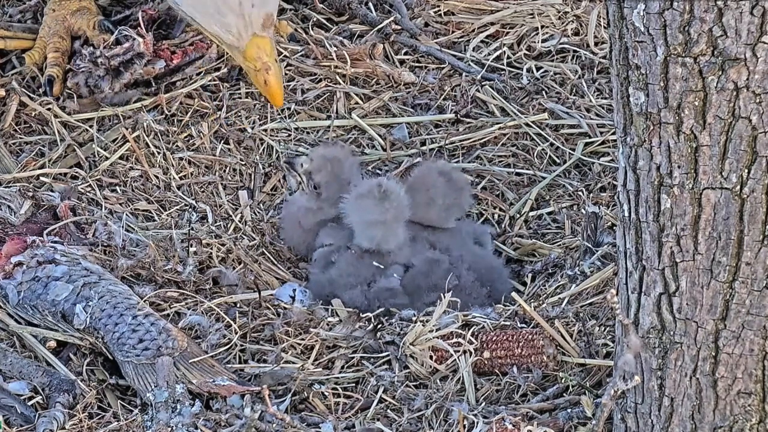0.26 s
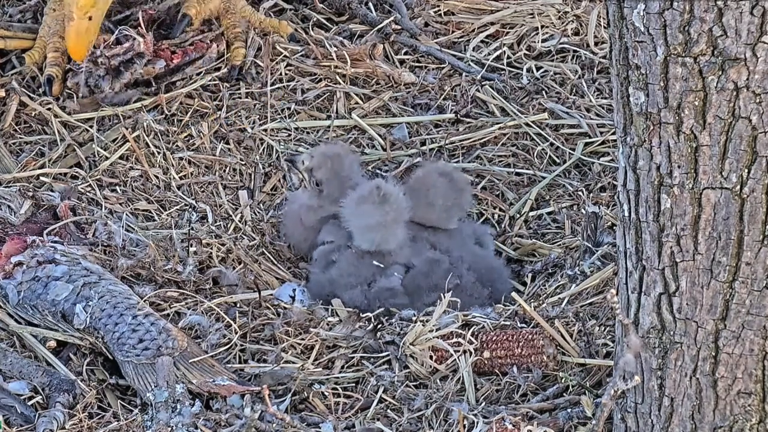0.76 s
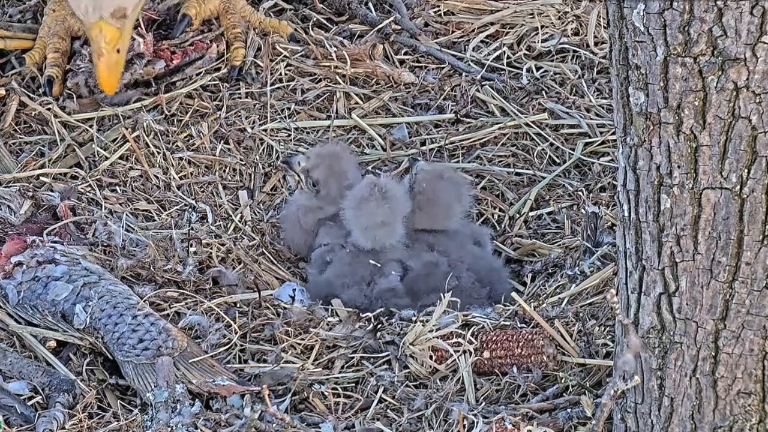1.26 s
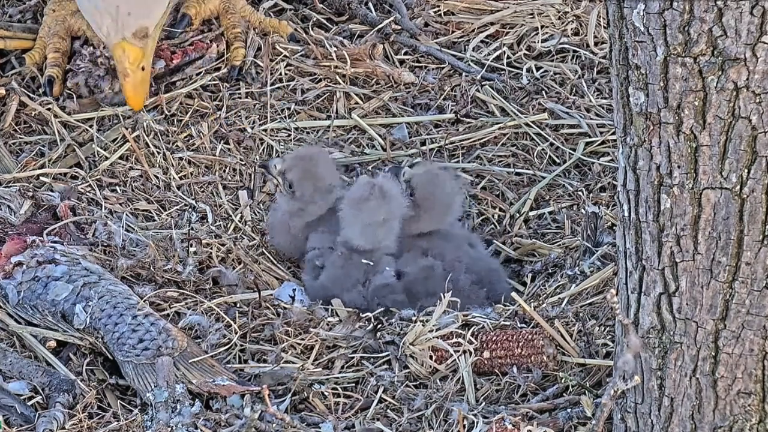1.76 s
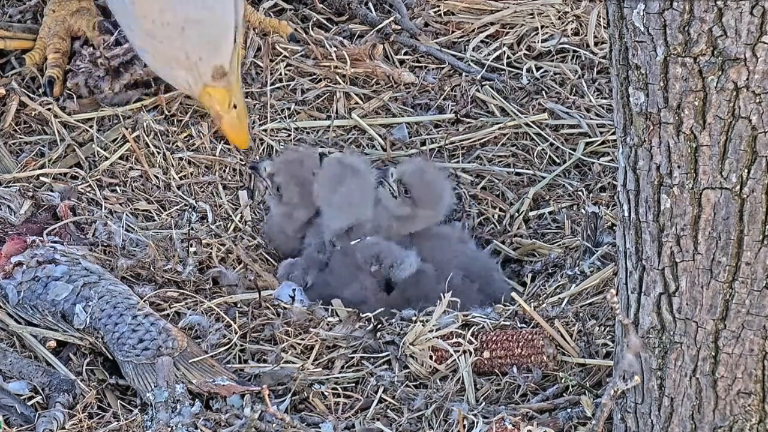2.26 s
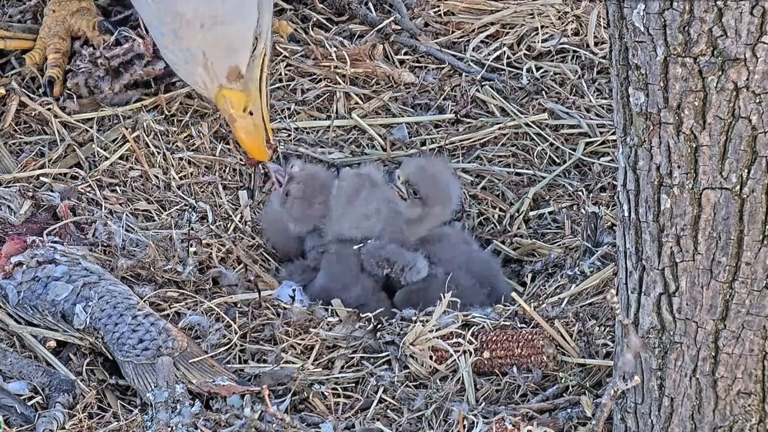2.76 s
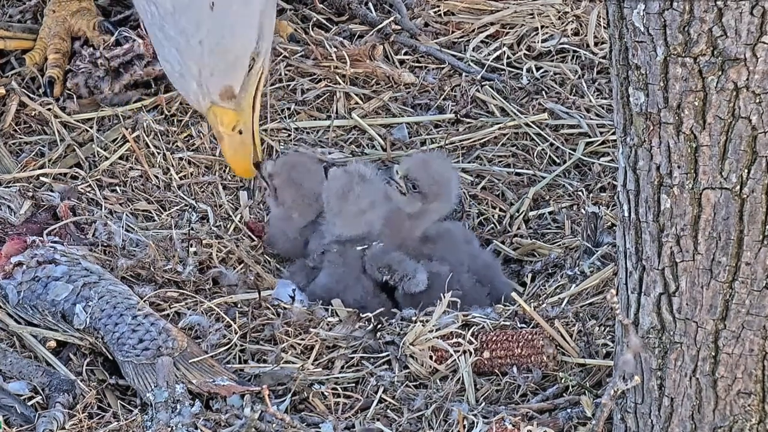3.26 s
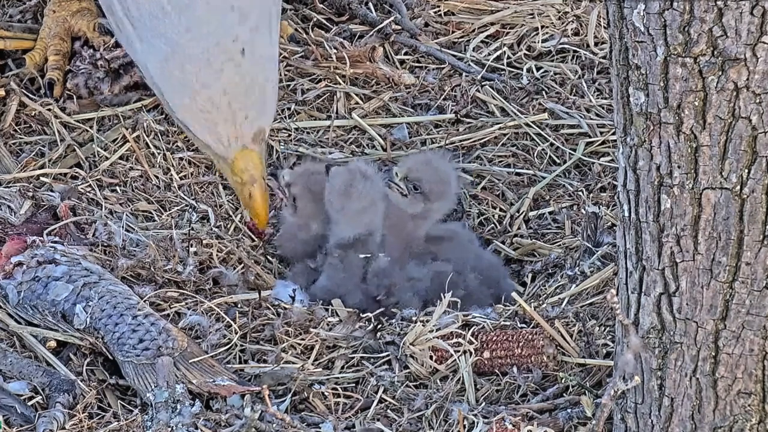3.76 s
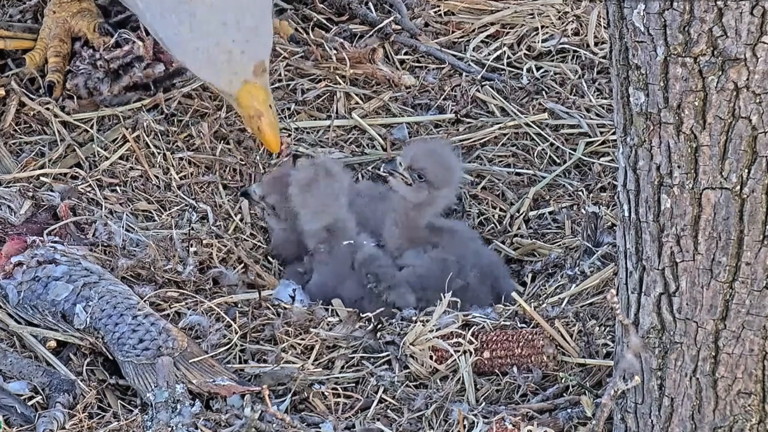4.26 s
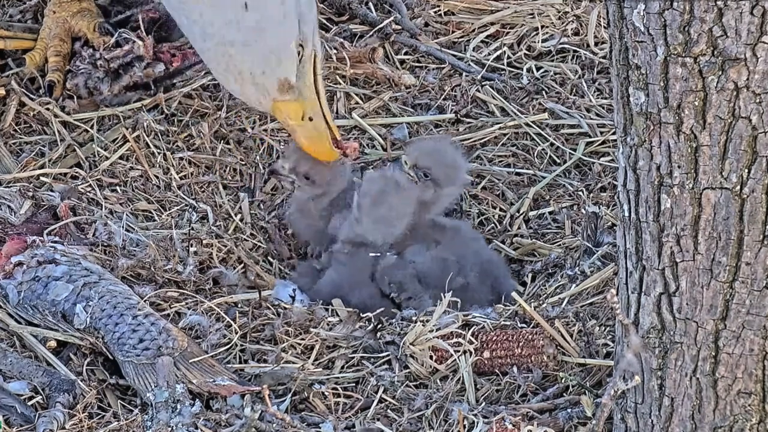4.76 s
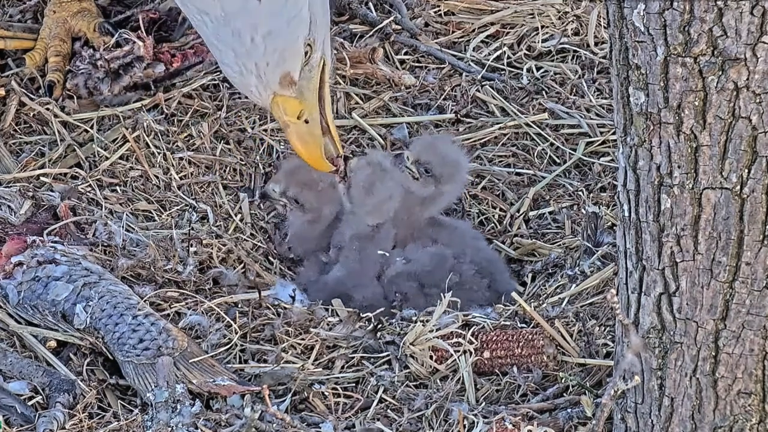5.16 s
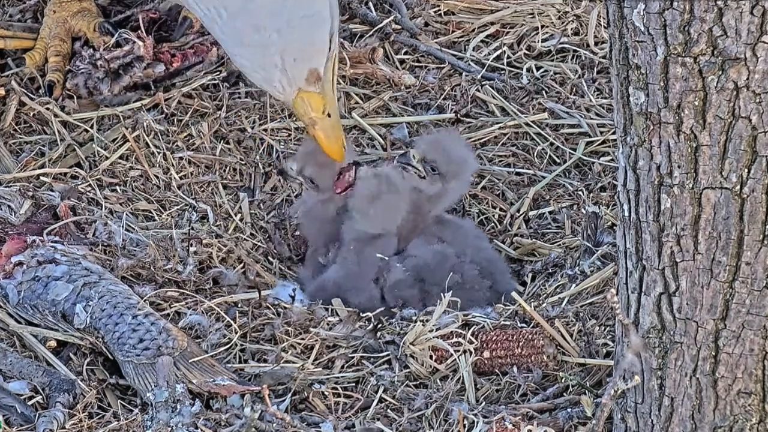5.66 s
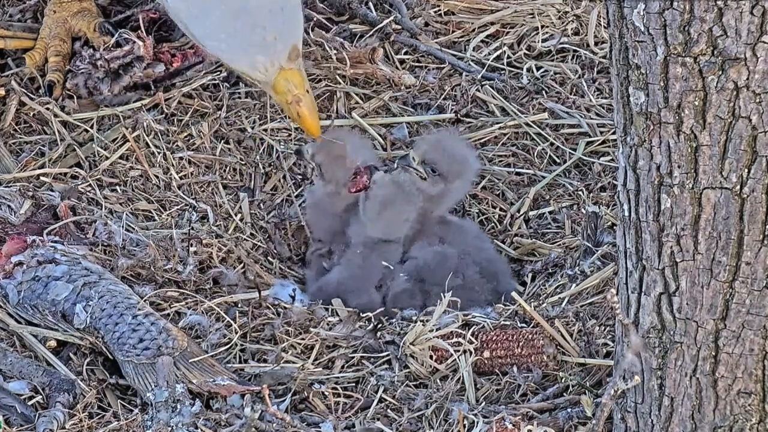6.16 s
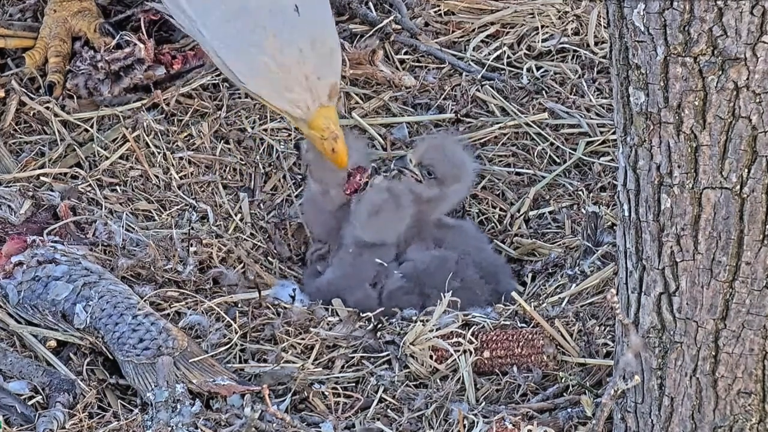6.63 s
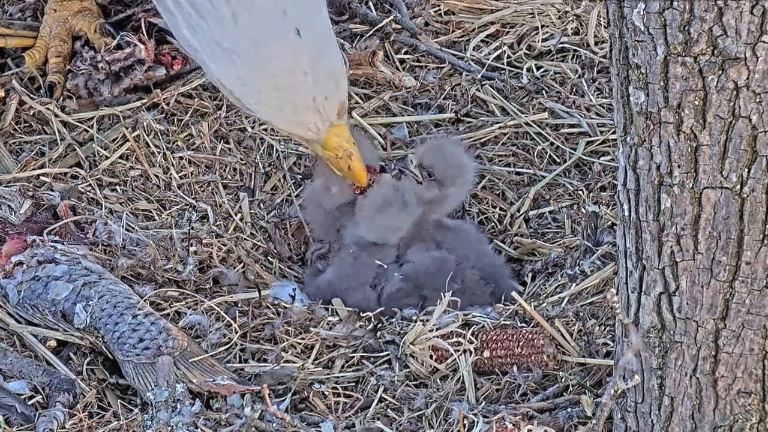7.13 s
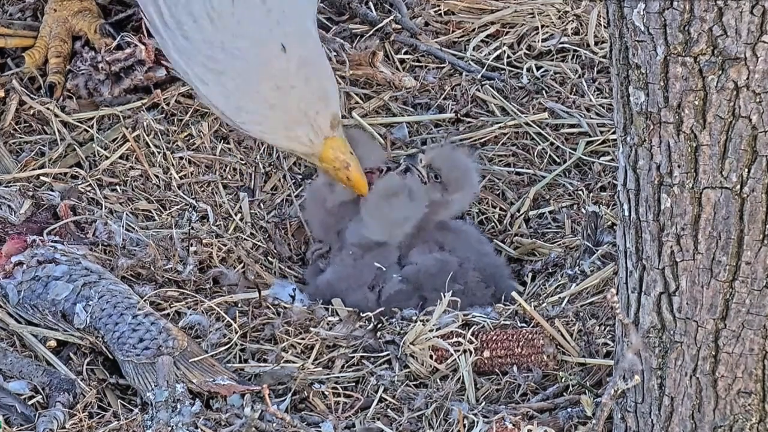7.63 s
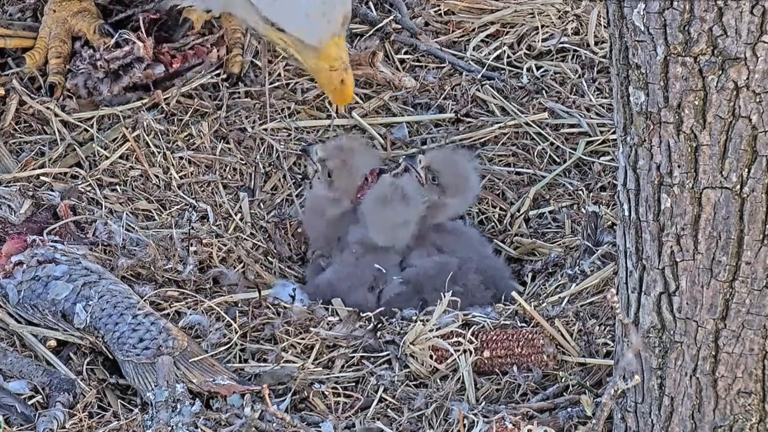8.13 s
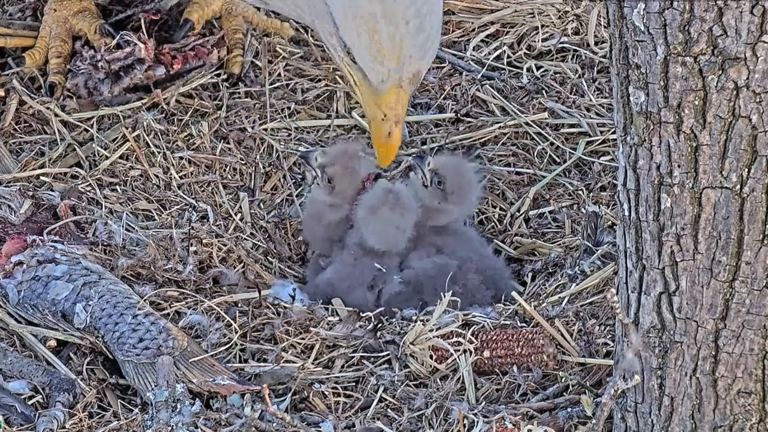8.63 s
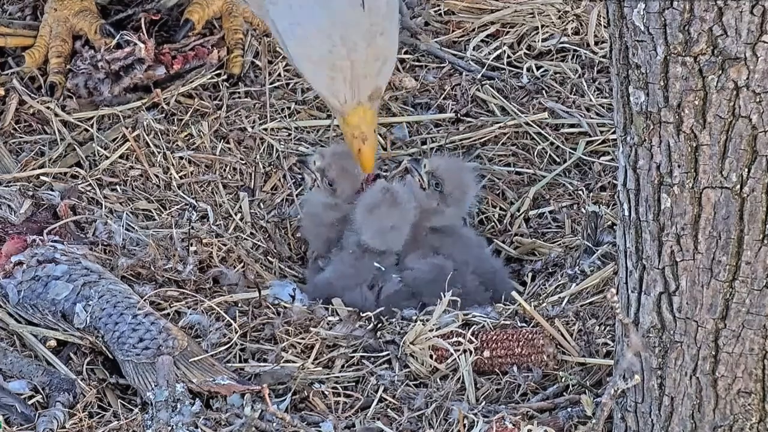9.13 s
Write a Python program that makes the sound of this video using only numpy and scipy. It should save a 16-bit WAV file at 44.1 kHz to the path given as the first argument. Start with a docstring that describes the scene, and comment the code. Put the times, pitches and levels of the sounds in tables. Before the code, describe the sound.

Downy eagle chicks in a treetop nest peep shrilly while an adult feeds them. Held whistles edging upward come first, then sharp chips, more whistles, and a regular run of quick multi-note begging calls. Softer whistles and two swooping bird songs follow, then scattered peeps. Distant traffic hum, hiss and a faint woodland chorus lie behind; the fixed camera microphone's stream ticks and briefly drops out.

```python
"""Chicks in a treetop nest peep, call and whistle: gliding sines with faint overtones and shaped puffs.
Other birds of the wood swoop, slide, fall and climb in pitch; a far chorus is many random short notes.
Leaves make the voices waver, and trunks return them as a long thin tail of random echoes.
Shaped noise is far traffic hum below and microphone hiss above; engine tones pass.
The camera's stream stutters: short gaps of silence and decaying ticks."""
import sys
import numpy as np
from scipy import signal
from scipy.fft import next_fast_len
from scipy.io import wavfile
from scipy.ndimage import uniform_filter1d

SR = 44100
rng = np.random.default_rng(int(sys.argv[2]) if len(sys.argv) > 2 else 0)


def int16_out(signal):
    """Quantize to a 16-bit WAV file."""
    q = np.round(np.clip(np.atleast_2d(signal).T, -1, 1) * 32767)
    wavfile.write(sys.argv[1], SR, q.astype(np.int16))


N = 414099  # samples

# Bird levels hold before flutter and mixing; note pitches hold before the onset scoop.
# held whistles creeping up in pitch:
# (time [s], length [s], end pitch [Hz], level [dB], share of the length spent swelling [1])
WHISTLES = [(0.921, 0.13, 2690, -35.5, 0.46), (1.197, .165, 2720, -22.5, 0.84),
            (1.384, 0.038, 2700, -30, 0.25), (1.497, .13, 2704, -21, 0.87), (2.699, 0.11, 2594, -39.5, .08),
            (2.931, 0.13, 2580, -37, 0.092), (3.147, 0.12, 2580, -37, 0.36), (3.656, 0.2, 2690, -30, 0.072),
            (3.89, 0.15, 2758, -24.5, 0.45), (4.042, 0.052, 2700, -30.5, 0.32),
            (4.174, 0.14, 2690, -23.5, 0.87), (4.349, .044, 2707, -28, 1), (5.819, 0.061, 2590, -35.5, 1),
            (6.298, 0.077, 2567, -37.5, 0.31), (6.698, 0.21, 2647, -32.5, 0.29),
            (6.947, 0.24, 2713, -27, 0.55), (7.223, .2, 2695, -29, 0.84), (7.443, 0.049, 2710, -32, .6),
            (7.536, 0.061, 2741, -30, 0.19), (9.373, 0.041, 2690, -34, .56)]
# second and third partial of a note: (level relative to the fundamental [dB])
OVERTONE_DB = [-51.5, -57]
# short notes, one table per shape: (time [s], length [s], start pitch [Hz], level [dB])
PEEPS = [(.306, 0.0094, 2710, -48), (.455, .023, 2717, -24), (.778, 0.015, 2640, -21.5),
         (.818, 0.022, 2670, -34.5), (1.058, 0.0073, 2638, -22.5), (1.103, .02, 2626, -28),
         (1.637, .029, 2721, -20.5), (2.483, 0.052, 2575, -35.5), (6.042, 0.085, 2580, -36.5),
         (6.492, 0.046, 2600, -34), (7.621, 0.044, 2800, -28), (7.805, 0.032, 2660, -34.5),
         (8.41, 0.042, 2620, -43.5), (8.513, .017, 2580, -23.5), (8.792, 0.012, 2580, -23.5),
         (9.058, 0.013, 2590, -30)]
RISING_PEEPS = [(.992, 0.021, 2560, -23.5), (4.76, 0.019, 2590, -19.5), (7.939, 0.027, 2587, -24.5),
                (8.226, .028, 2507, -25.5)]
PIPS = [(0, 0.063, 3960, -43.5), (.01, 0.22, 7850, -65.5), (.302, 0.12, 3275, -36.5),
        (.628, .064, 3365, -35.5), (.898, 0.12, 3415, -52), (1.72, 0.078, 4150, -62.5),
        (2.57, 0.049, 4320, -56), (4.928, 0.044, 4895, -56), (5.19, .06, 6900, -59),
        (5.33, 0.055, 7020, -55), (5.678, 0.051, 5620, -54), (5.71, 0.056, 6530, -52),
        (5.842, 0.018, 1730, -45), (5.949, 0.048, 2053, -40), (5.962, .058, 8070, -59),
        (6.052, 0.024, 1710, -51.5), (6.503, .016, 1730, -43), (6.97, .019, 1764, -47.5),
        (9.142, 0.044, 4050, -54.5)]
FALLS = [(.089, .04, 4300, -41), (.207, 0.02, 5900, -50), (.499, .076, 1466, -48),
         (.523, 0.023, 6700, -51.5), (.748, 0.062, 9130, -53.5), (.868, .059, 1466, -46.5),
         (1.205, 0.038, 7800, -64), (1.802, 0.029, 4430, -53), (2.498, .04, 4300, -53),
         (2.502, 0.049, 2180, -45.5), (2.96, .039, 1466, -47), (4.551, .045, 4450, -47),
         (4.86, 0.078, 8700, -73), (4.565, 0.071, 8500, -70.5), (4.952, 0.046, 4150, -38),
         (5.032, 0.038, 1400, -43.5), (5.128, .038, 7200, -52), (5.134, .028, 4520, -43),
         (5.268, .037, 4480, -43.5), (5.272, 0.025, 7080, -51), (5.457, 0.018, 4100, -34.5),
         (5.49, 0.044, 7600, -60.5), (5.632, .07, 6700, -46.5), (5.733, .054, 2200, -38),
         (5.738, 0.078, 8580, -60), (6.033, 0.018, 2500, -37.5), (7.59, .04, 4270, -50.5),
         (8.36, 0.11, 1900, -61), (8.392, 0.063, 3800, -54), (8.392, 0.069, 7570, -70),
         (8.65, 0.12, 1730, -60), (8.659, 0.062, 3950, -51.5), (8.662, 0.048, 7700, -68),
         (8.89, 0.077, 2190, -53.5), (8.918, .043, 4350, -60), (8.93, 0.024, 7730, -69)]
CLIMBS = [(.068, 0.037, 4950, -47), (.123, 0.025, 6240, -43.5), (.76, .04, 7300, -54.5),
          (0.796, 0.037, 7920, -51), (5.161, 0.015, 6470, -44.5), (5.316, 0.017, 6000, -48.5),
          (6.098, .021, 3900, -49), (8.354, 0.025, 3380, -48)]
# how far a falling note drops: (start pitch [Hz], end pitch over start pitch [1])
FALL_RATIO = [(1500, .87), (2150, .9), (2600, .8), (4300, .8), (7000, .85), (9000, .93)]
# sharp chips: (time [s], length [s], start pitch [Hz], end pitch [Hz], level [dB])
CHIPS = [(1.841, 0.03, 3164, 2980, -25), (2.203, 0.026, 3137, 2710, -21), (2.253, 0.018, 2860, 2660, -33.5),
         (2.564, .05, 3135, 3008, -23.5), (2.912, 0.025, 3490, 2850, -24.5),
         (3.353, 0.062, 3030, 2860, -39), (4.143, 0.053, 3217, 3085, -32.5),
         (5.095, 0.018, 3160, 3200, -35), (5.69, .024, 3264, 3210, -34), (6.01, 0.031, 3126, 3017, -22.5),
         (9.232, 0.015, 2850, 3180, -19)]
# begging calls of peep, chip and drop:
# (time [s], peep level [dB], chip delay [s], chip level [dB], drop level [dB])
CALLS_OF_THREE = [(4.416, -19.5, 0.029, -30.5, -41), (4.711, -18.5, 0.031, -26, -45),
                  (4.998, -23.5, .037, -23, -33.5), (5.301, -16, .035, -20.5, -33.5),
                  (5.607, -16, 0.029, -25, -31)]
# swooping song of a nearby bird, one list per strand; the last sounds an octave below the second:
# (time in the song [s], level [dB], pitch [Hz])
SWOOP = [
    [(0, -56.5, 9050), (.015, -33.5, 6950), (.03, -39, 5810), (.06, -62, 5300)],
    [(.06, -47.5, 4550), (.08, -34.5, 3920), (.105, -38, 3553), (.16, -38, 3217), (.25, -34, 2900),
     (.33, -26, 2577)],
    [(.11, -64.5, 1750), (.2, -63.5, 1559), (.33, -50, 1320)],
]
# its plays: (time [s], level offset [dB])
SWOOPS = [(6.14, 0.06), (6.604, 0.1)]
# downward slide of a farther bird, one list per strand: (time in the song [s], level [dB], pitch [Hz])
SLIDE = [
    [(0, -35, 2202), (.03, -36.5, 2030)],
    [(.035, -48.5, 1850), (.1, -51, 1600), (.17, -55, 1414)],
]
# its plays: (time [s], level offset [dB])
SLIDES = [(4.265, -9.5), (4.558, -7), (4.855, -5), (5.148, -3.5), (5.455, -1.5)]
# far birds before mixing: (centre pitch [Hz], pitch spread [Hz], rms level [dB])
CHORUS = [(2643, 265, -55), (3050, 240, -70), (3963, 750, -71.5), (1995, 830, -64.5), (5210, 1200, -76.5),
          (6860, 2200, -77.5), (8470, 3000, -81)]
# decay of the echoes in the wood: (frequency [Hz], time to fall by 60 dB [s])
WOOD = [(1500, 0.91), (2700, 1.11), (7000, 0.67)]
# spectral shape of the background, traffic hum below and microphone hiss above:
# (frequency [Hz], relative level [dB])
BACKGROUND = [(20, -5), (88, -5.5), (422, -8), (1030, 5), (1480, -11.5), (1900, -26), (2700, -0.5),
              (4500, -35.5), (7500, -32.5), (9500, -40.5), (9800, -45.5), (15600, -43.5)]
# traffic swells before weighting by frequency: (time [s], level [dB])
RUMBLE = [(0, 4), (1.602, 7.5), (3, 2.5), (4.201, 8), (5.6, 10), (7.403, 4), (8.298, 7), (9.39, 6.5)]
# far engine tones: (start [s], end [s], mean pitch [Hz], mean level [dB])
DRONES = [(1.192, 2.299, 358, -57.5), (2.4, 3.61, 479, -62), (4.9, 7.405, 472.2, -60)]
# silences of the stream: (start [s], end [s])
GAPS = [(.289, .296), (1.9775, 1.985), (3.6135, 3.652), (3.666, 3.668), (5.3476, 5.356), (7.0961, 7.105),
        (7.4951, 7.5355), (8.061, 8.0805), (8.0997, 8.119), (8.7842, 8.793), (8.864, 8.867), (9.074, 9.098)]
# ticks where the stream is joined: (time [s], peak level [dB])
TICKS = [(0.0188, -29.5), (.0327, -42), (.6674, -46), (1.0271, -38.5), (1.3411, -27.5), (1.762, -35),
         (2.3519, -42), (2.713, -44), (3.0282, -31.5), (3.6518, -39), (4.0381, -29), (4.406, -40),
         (4.7739, -16.5), (5.1413, -40), (5.349, -23), (5.3568, -19), (6.4619, -34), (6.8856, -19.5),
         (7.0973, -37), (7.104, -32), (7.4188, -44), (7.5358, -31.5), (8.1192, -36), (8.1466, -37),
         (8.793, -41)]

CREEP = 0.96  # start pitch of a whistle over its end pitch
# shapes: (end pitch over start pitch, share of the length spent swelling)
PEEP, RISING_PEEP, PIP, CLIMB = (0.96, 0.45), (1.055, 0.71), (1.001, 0.18), (1.18, 0.48)
FALL_RISE, CHIP_RISE = 0.52, 0.49  # share of the length spent swelling
# notes of a begging call: (length [s], start pitch [Hz], end pitch [Hz], share swelling)
FIRST, SECOND, THIRD = (0.029, 2655, 2750, 0.51), (.032, 3245, 3060, .3), (0.02, 2650, 2050, 0.47)
DROP_AFTER_S = .028  # from the chip to the drop
TRILL_HZ, TRILL_DEPTH = 115, .45  # throb of the peep in a begging call
# glint near the third partial of a chip: length, (start, end) pitch, level relative to the chip
CHIP_THIRD_S, CHIP_THIRD_HZ, CHIP_THIRD_DB = .022, (9500, 8800), -37
WOOD_DB = -8.5  # near birds sent to the wood
BACKGROUND_DB = -47.5  # rms of the hum and hiss without engine tones
FADE_IN_S = .001  # return after a gap
TICK_S, TICK_HZ = 0.00038, 2600  # decay time and swing of a tick
EDGE_HZ = 15550  # band limit of the stream


def gain_of(db):
    """Logarithmic level: 20 dB is a factor of ten in amplitude."""
    return 10 ** (np.asarray(db) / 20)


def evened(x):
    """Normalisation of power: scales to rms 1."""
    return x / np.sqrt(np.mean(x ** 2) + 1e-20)


def read(points, hz):
    """Interpolation on a logarithmic frequency axis."""
    f, value = np.transpose(points)
    return np.interp(np.log(hz + 1), np.log(f + 1), value)


def add(mix, s, sound):
    """Superposition: adds a sound in place at time s."""
    part = mix[max(round(s * SR), 0):][:len(sound)]
    part += sound[:len(part)]


def chirp(length, start_hz, end_hz, db, rise):
    """Syrinx puff: frequency modulation by an onset scoop and a settling glide, with faint harmonics."""
    u = np.linspace(0, 1, max(round(length * SR), 100))  # progress through the note
    scoop = 1 + 0.079 * np.sign(start_hz - end_hz) * np.exp(-u * length / 0.0018)
    glide_hz = end_hz + (start_hz - end_hz) * (1 - u) ** 1.3
    phase = 2 * np.pi * np.cumsum(scoop * glide_hz) / SR
    rise = np.clip(rise, .05, .95)
    puff = np.sin(np.pi / 2 * np.minimum(u / rise, (1 - u) / (1 - rise))) ** 0.67
    tone = np.sin(phase)
    for partial, overtone_db in enumerate(OVERTONE_DB, 2):
        tone += gain_of(overtone_db) * np.sin(partial * phase)
    return gain_of(db) * puff * tone


def held_whistles():
    """Upward frequency glide: each whistle creeps to its end pitch."""
    out = np.zeros(N)
    for s, length, hz, db, rise in WHISTLES:
        add(out, s, chirp(length, CREEP * hz, hz, db, rise))
    return out


def begging_calls():
    """Amplitude modulation in a note sequence: a throbbing peep, then a chip and a drop."""
    out = np.zeros(N)
    for s, peep_db, after, chip_db, drop_db in CALLS_OF_THREE:
        peep = chirp(*FIRST[:3], peep_db, FIRST[3])
        throb = np.sin(np.pi * TRILL_HZ * np.arange(len(peep)) / SR) ** 2
        add(out, s, peep * (1 - TRILL_DEPTH * throb))
        add(out, s + after, chirp(*SECOND[:3], chip_db, SECOND[3]))
        add(out, s + after + DROP_AFTER_S, chirp(*THIRD[:3], drop_db, THIRD[3]))
    return out


def short_notes():
    """Proportional pitch bends shape peeps and pips; a brief high partial sharpens the chips."""
    out = begging_calls()
    for rows, (bend, rise) in ((PEEPS, PEEP), (RISING_PEEPS, RISING_PEEP), (PIPS, PIP)):
        for s, length, hz, db in rows:
            add(out, s, chirp(length, hz, bend * hz, db, rise))
    for s, length, start_hz, end_hz, db in CHIPS:
        add(out, s, chirp(length, start_hz, end_hz, db, CHIP_RISE))
        add(out, s, chirp(CHIP_THIRD_S, *CHIP_THIRD_HZ, db + CHIP_THIRD_DB, CHIP_RISE))
    return out


def whistle(rows):
    """Phase is the integral of frequency: a sine follows a pitch and level curve."""
    s, db, hz = np.transpose(rows)
    t = np.arange(s[0], s[-1], 1 / SR)
    tone = np.sin(2 * np.pi * np.cumsum(np.interp(t, s, hz)) / SR)
    edges = signal.windows.tukey(len(t), min(600 / len(t), 1))
    # the root of 2 makes the table level an rms level
    return np.sqrt(2) * gain_of(np.interp(t, s, db)) * tone * edges


def songs():
    """Superposed whistled strands: the swooping song and the downward slide."""
    out = np.zeros(N)
    for song, plays in ((SWOOP, SWOOPS), (SLIDE, SLIDES)):
        for s, db in plays:
            for rows in song:
                add(out, s + rows[0][0], gain_of(db) * whistle(rows))
    return out


def glides():
    """Frequency glides of farther birds: falls by a pitch-dependent ratio, climbs by a fixed one."""
    out = np.zeros(N)
    for s, length, hz, db in FALLS:
        add(out, s, chirp(length, hz, read(FALL_RATIO, hz) * hz, db, FALL_RISE))
    climb_ratio, climb_rise = CLIMB
    for s, length, hz, db in CLIMBS:
        add(out, s, chirp(length, hz, climb_ratio * hz, db, climb_rise))
    return out


def fluttered(x, depth, size):
    """Scattering by moving leaves: a random complex gain adds to the straight path."""
    a, b = rng.standard_normal((2, N))
    a = evened(uniform_filter1d(uniform_filter1d(a, size=size), size=size))
    b = evened(uniform_filter1d(uniform_filter1d(b, size=size), size=size))
    analytic = signal.hilbert(x, next_fast_len(N))[:N]
    return (analytic * (1 + depth * (a + 1j * b))).real / np.sqrt(1 + 2 * depth ** 2)


def birds():
    """Superposition of near and middle voices, each kind with its own scattering."""
    out = fluttered(short_notes(), 0.23, size=90)
    out += fluttered(held_whistles(), 0.088, size=500)
    out += fluttered(songs(), 0.38, size=150)
    return out + fluttered(glides(), 0.34, size=45)


def chorus(count=170):
    """Random superposition: many short notes around favourite pitches, most of them falling."""
    out = np.zeros(N)
    for hz, spread_hz, db in CHORUS:
        band = np.zeros(N)
        for when, place, stretch, bend, loud in rng.random((count, 5)):
            start_hz = hz + spread_hz * (place - .5)
            end_hz = start_hz + .7 * spread_hz * (bend - .7)
            add(band, when * N / SR, chirp(0.018 + .07 * stretch, start_hz, end_hz, 10 * loud, 0.54))
        out += gain_of(db) * evened(band)
    return out


def branches(x, count=9):
    """Early reflection: a few close echoes off trunk and branches thicken each note."""
    taps = np.zeros(SR // 20)
    delay_s = np.geomspace(.003, .045, count) * rng.uniform(.9, 1.1, count)
    taps[(delay_s * SR).astype(int)] = rng.choice([-1., 1.], count)
    decay = gain_of(-200 * np.arange(len(taps)) / SR)  # 200 dB per second
    return signal.oaconvolve(x, taps * decay)[:N]


def wood(x):
    """Reverberation off trunks: sparse echoes of random sign, each band dying at its own speed."""
    taps = np.zeros(SR)
    at = np.arange(500, SR - 20, 20)
    # stands of trunks echo in clumps
    trunks_db = 3 * evened(uniform_filter1d(rng.standard_normal(len(at)), size=25))
    signs = rng.choice([-1., 1.], len(at))
    taps[at + rng.integers(0, 20, len(at))] = signs * gain_of(trunks_db)
    hz, t, z = signal.stft(taps, SR, nperseg=256)
    decay = gain_of(-60 * t / read(WOOD, hz)[:, None])
    tail = signal.istft(z * decay, SR, nperseg=256)[1]
    return signal.fftconvolve(x, tail / np.linalg.norm(tail))[:N]


def engine_tones(out):
    """Slow frequency and amplitude modulation: far engine tones waver as they come and go."""
    for s, end, tone_hz, db in DRONES:
        n = round((end - s) * SR)
        waver = evened(uniform_filter1d(rng.standard_normal(N), size=2500))[:n]
        tone = np.sin(2 * np.pi * np.cumsum(tone_hz + 5 * waver) / SR)
        add(out, s, gain_of(db + waver[::-1]) * tone * signal.windows.tukey(n, .5))


def background():
    """Spectrally shaped noise: traffic hum below, microphone hiss above, and far engine tones."""
    frames, hz = N // 256 + 5, np.fft.rfftfreq(1024, 1 / SR)
    a, b, patches = rng.standard_normal((frames, 513, 3)).T
    patches = uniform_filter1d(patches, size=10, axis=0)  # across frequency
    patches = evened(uniform_filter1d(patches, size=14, axis=1))  # across time
    swell = evened(uniform_filter1d(rng.standard_normal(frames), size=60))
    # patchy treble, even hiss on top
    depth_db = np.interp(hz, [1200, 2000, 9500, 9800], [1.8, 3.1, 5.4, .2])[:, None]
    rumble_db = np.interp(np.arange(frames) * 256 / SR, *np.transpose(RUMBLE))
    bass_share = read([(40, 0.61), (150, 0.84), (300, 0.7), (600, 0.065)], hz)[:, None]
    level_db = read(BACKGROUND, hz)[:, None] + depth_db * patches + 0.11 * swell + rumble_db * bass_share
    noise = signal.istft((a + 1j * b) * gain_of(level_db), nperseg=1024, noverlap=768)[1][:N]
    out = gain_of(BACKGROUND_DB) * evened(noise)
    engine_tones(out)
    return out


def scene():
    """Superposition of direct sound, reflections and background."""
    near, far = birds(), fluttered(chorus(), .35, size=450)
    wet = gain_of(WOOD_DB) * near + far
    # two tails fed in turn: the birds sit at different places
    half = np.sin(np.pi * np.arange(N) / SR / 1.3)
    tails = wood(wet * half) + wood(wet * np.sqrt(1 - half ** 2))
    voices = near + gain_of(-4.5) * far + gain_of(-11.0) * branches(near + far) + tails
    # little of the voices is heard above 9.6 kHz
    voices = signal.sosfilt(signal.butter(16, 9600, fs=SR, output="sos"), voices)
    return (voices + background())[None]


def record(dry):
    """Gating, impulses and low-pass filtering: the stream drops out, ticks and limits the band."""
    t, out = np.arange(N) / SR, dry.copy()
    for s, end in GAPS:
        out *= np.where(t < s, 1, np.clip((t - end) / FADE_IN_S, 0, 1))
    tick_t = t[:40]
    tick = np.exp(-tick_t / TICK_S) * np.cos(2 * np.pi * TICK_HZ * tick_t)  # a jump swings back and dies
    for s, db in TICKS:
        add(out[0], s, gain_of(db) * tick)
    low_pass = signal.firwin(511, EDGE_HZ, window=("kaiser", 9), fs=SR)
    return signal.oaconvolve(out, low_pass[None], "same")


dry = scene()
out = record(dry)
int16_out(out)
```